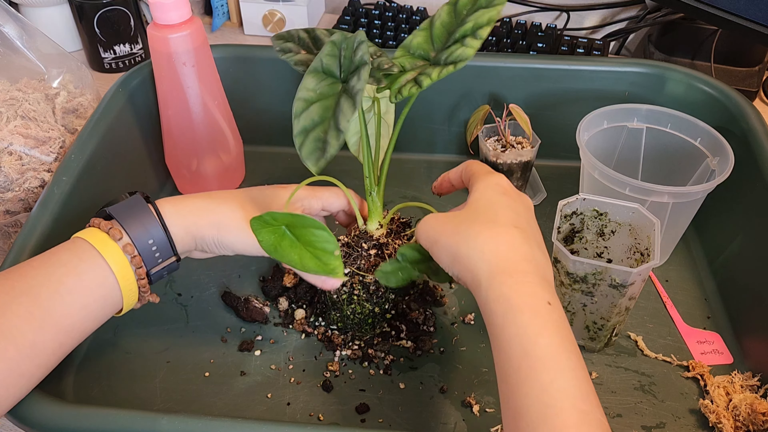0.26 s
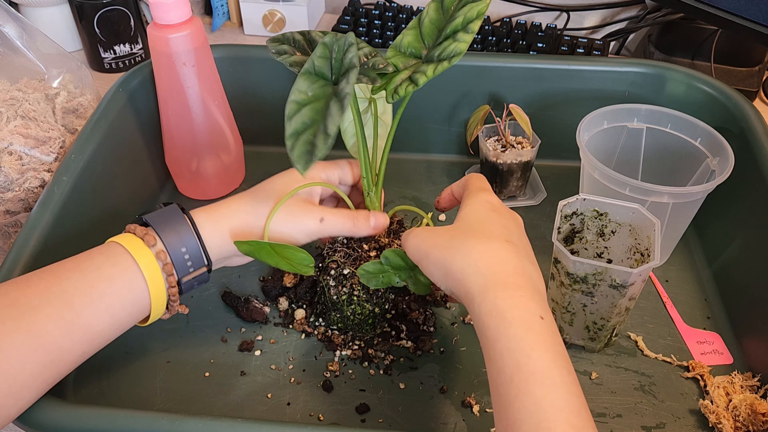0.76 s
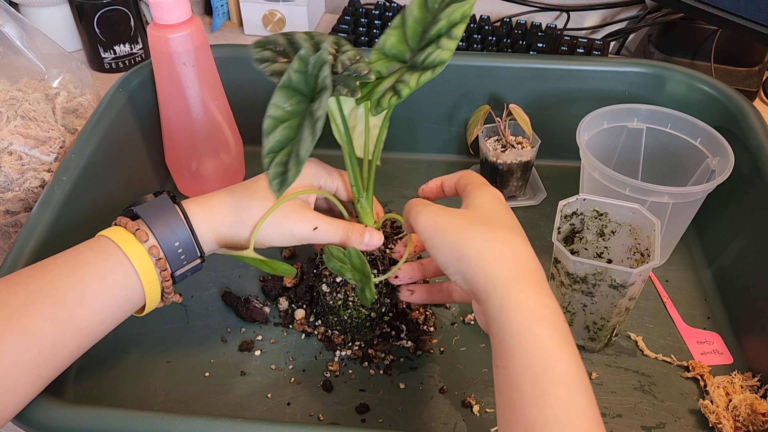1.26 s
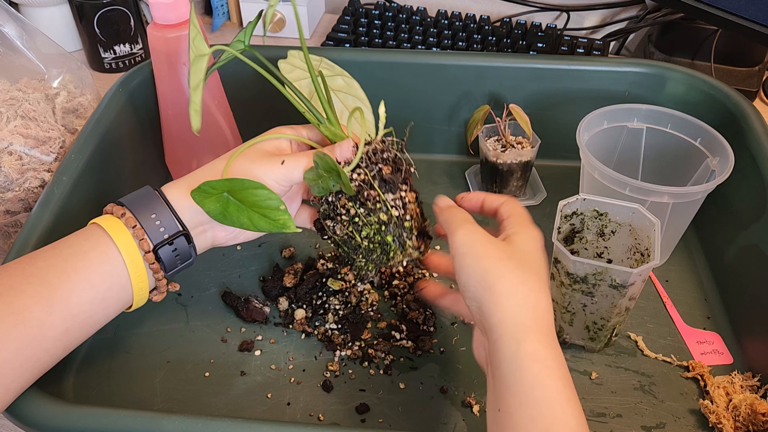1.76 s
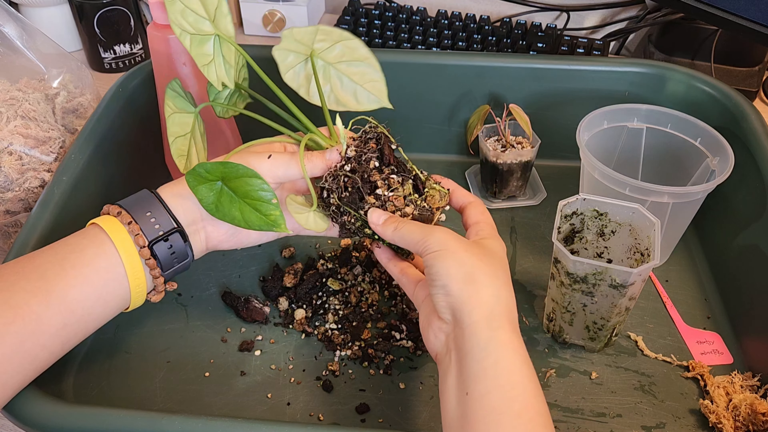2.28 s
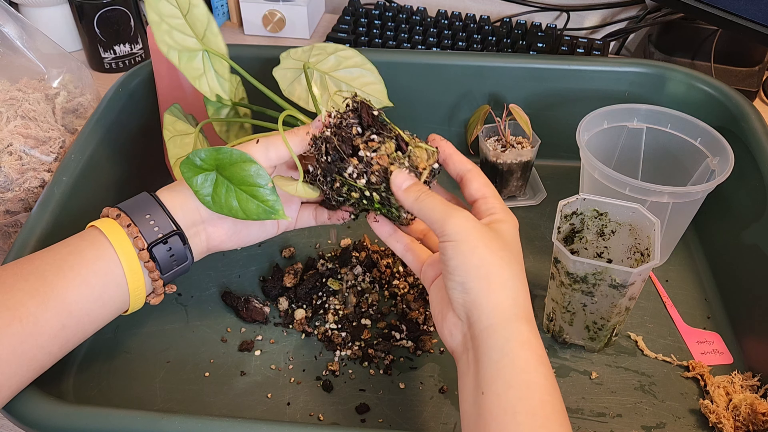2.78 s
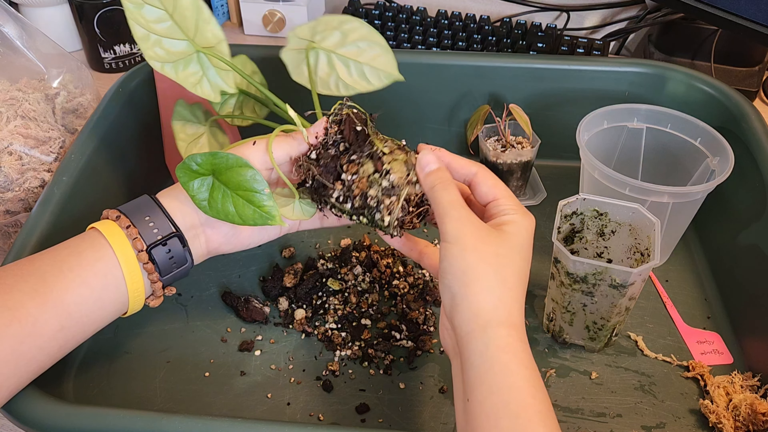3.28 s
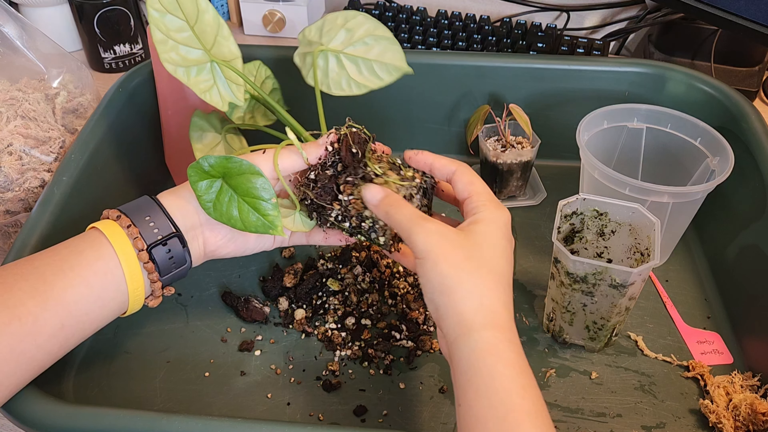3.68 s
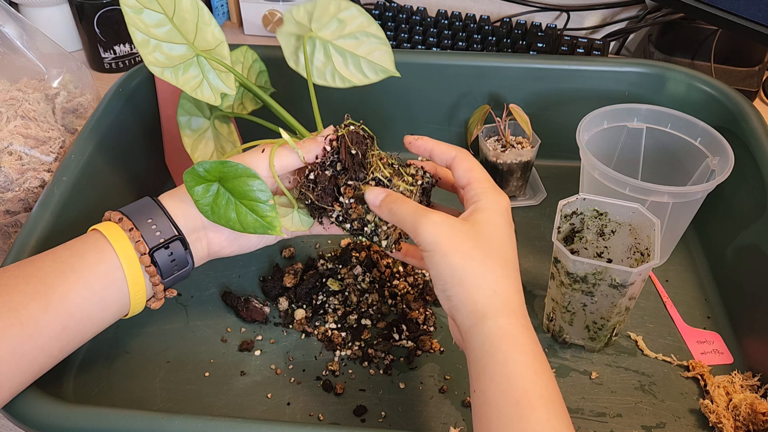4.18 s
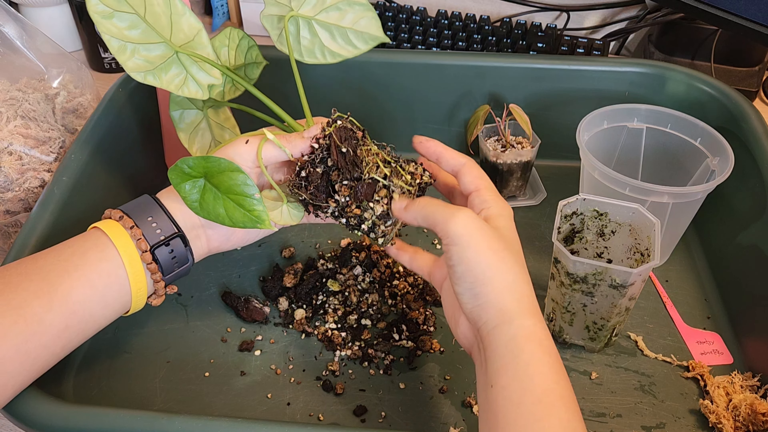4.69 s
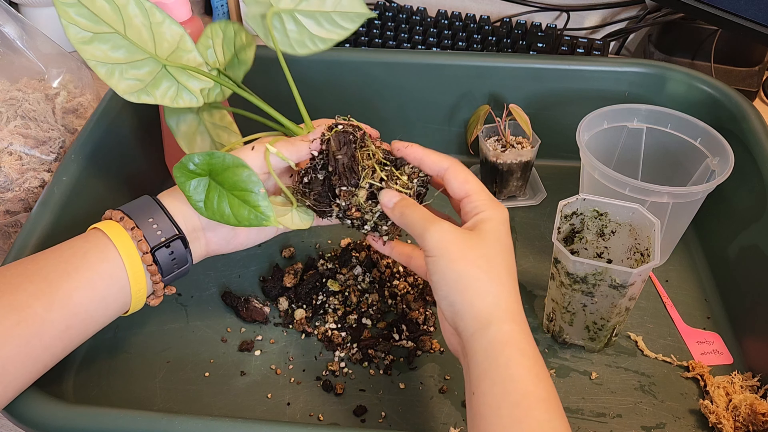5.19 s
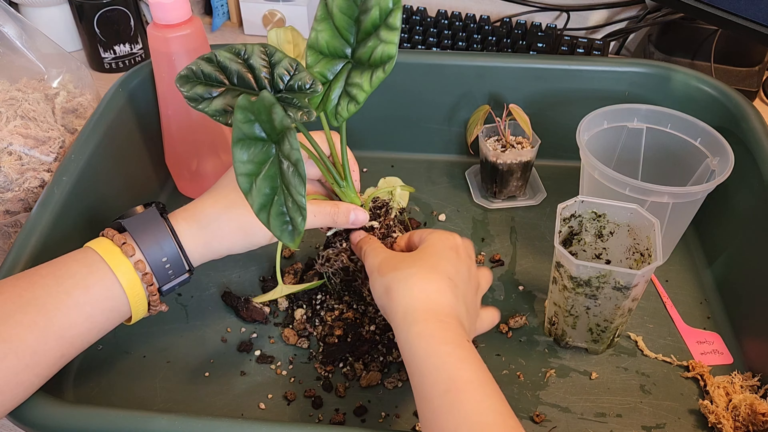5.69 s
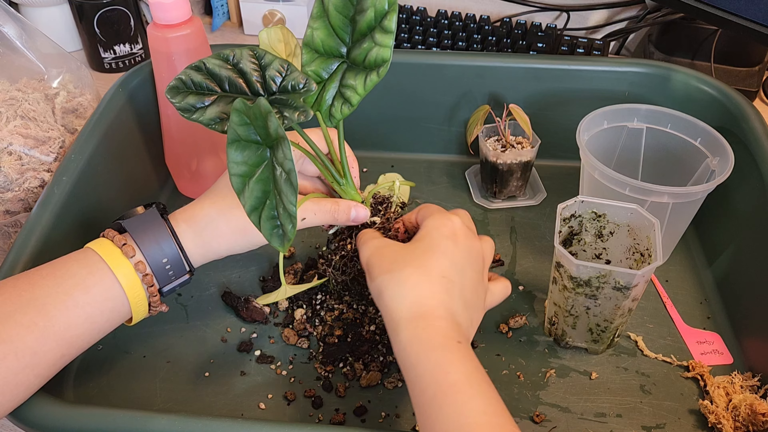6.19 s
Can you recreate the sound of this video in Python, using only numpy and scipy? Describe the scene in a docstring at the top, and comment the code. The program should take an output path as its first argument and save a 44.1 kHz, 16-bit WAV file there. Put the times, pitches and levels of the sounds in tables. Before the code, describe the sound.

Close, wide stereo sound of gritty soil falling into a plastic tub in a quiet room. An early flurry of clicks gives way to tiny sparse ticks, then busier pattering and a hard burst of knocks midway. Afterwards only faint crumbs, a few muted bumps and one clear click remain. The rustling abruptly fades after a tiny dip near the end, leaving soft rumble and hum.

```python
"""Grit and bark drop on a plastic tray as hands loosen a houseplant's root ball in a quiet room.
Each grain is a cracking noise burst, a short pitched ring and a diffuse tail; decaying sines thud below.
Flickering noise bands make a crumbling rustle and a treble hiss, over rumble and a faint hum.
Two spaced microphones hear it; all sound dips briefly once, near the end."""
import sys
import numpy as np
from scipy import signal
from scipy.io import wavfile

SR = 44100
rng = np.random.default_rng(int(sys.argv[2]) if len(sys.argv) > 2 else 0)


def digitize_waveform(pressure):
    """Quantize a signal to 16-bit integers and store it at the path in sys.argv[1].

    Rows of a 2-D input are taken as channels; values are limited to [-1, 1].
    """
    field = np.atleast_2d(pressure).T
    bounded = np.clip(field, -1, 1)
    quanta = np.round(bounded * 32767).astype(np.int16)
    wavfile.write(sys.argv[1], SR, quanta)


N = 284445

# Grit leaving for the tray. Each row: start in seconds, level in dB, ring pitch in Hz, then in dB:
# weight below 1 kHz, brightness near 6 kHz, sizzle above 10 kHz, ring, scattering crumbs.
GRIT_HITS = [(0.1496, -34.5, 670, -8.5, -26, -29, -9, -6.5), (0.3476, -35, 1630, -8, -9, -9, -7, -7),
             (0.3935, -50, 1630, -10, -14, -17, -8, -3), (0.4397, -58.5, 1350, -15, -2, -2, -1, -19),
             (0.5082, -49.5, 2400, -26, -3.5, -13, -4.5, -8.5), (0.5636, -46, 1950, -16, -3, -7.5, -4, -9),
             (0.5776, -44, 780, -10, -31, -25, -10, 4), (0.605, -28, 1310, -14.5, -39, -35, -5.5, -7),
             (0.625, -22, 1440, -9.5, -11, -17.5, -10, -6),
             (0.6677, -26, 1420, -19.5, -10.5, -24, -11, -8.5),
             (0.6955, -34, 2000, -10.5, -16, -34, -4, -7.5), (0.7238, -41, 970, 6.5, -5.5, -9, -16, -20.5),
             (0.7384, -53, 902, -2, -19, -10, -5, -23), (0.8718, -53.5, 990, -0.5, -28, -26, 1, -5),
             (0.8895, -55.5, 2100, -21, -22, -32, 1, 7), (0.941, -52, 1930, -6, -8, -31, -4, -1),
             (1.266, -49, 714, -26, -27, -28, -3, 6.5), (1.2835, -46, 870, -26, -19, -26, -3, -4),
             (1.298, -45, 2150, -19, -17, -34, -4, 4), (1.322, -52, 2200, -20, -18, -21, -8, -3),
             (1.3957, -57, 3220, -23, -12, -21, -2, 6.5), (1.4312, -53.5, 2200, -4, -11, -20, -8, -1),
             (1.4406, -54.5, 2170, -1, -10, -22, 5, 0.5), (1.5609, -40, 2080, -12.5, -20.5, -30, -5, 0.5),
             (1.579, -51, 1200, -12, -19, -24, -6, 9), (1.6127, -40, 3290, -13, -15, -29, -2, -12),
             (1.6204, -42.5, 2210, -10, -20, -28, -8, -4), (1.634, -50, 802, -16, -17, -16, -2, -8),
             (1.6582, -41.5, 2120, -11, -10.5, -9, -7, -14), (1.672, -42, 1810, -6, -18, -24, -3, -8),
             (1.72, -41.5, 999, -1.5, -5, -9, 0, -7.5), (1.7474, -39, 3120, -14, -23, -30, -8.5, 0.5),
             (1.7994, -50, 3200, -22, 2.5, -5, 0, -10), (2.0482, -55.5, 797, 4, -4, 1, -1, -3.5),
             (2.0698, -48.5, 4240, -20, 2, 2, -11, -4), (2.152, -28, 1600, -16, -11, -28, -20, -7),
             (2.2202, -29.5, 3300, -19, -7, -9, -4.5, -10), (2.3212, -50.5, 956, -1.5, -25, -16, -8, -7),
             (2.4453, -37, 1900, -12.5, -13.5, -16, -10, -7), (2.4997, -51, 956, -13, -9, -6, -1, -5),
             (2.5205, -47, 956, -23, -3.5, -9, -5, -4), (2.6743, -52.5, 844, -15, -17, -14, -6, -9),
             (2.7724, -30.5, 3100, -15, -10, -12.5, -10, -6), (2.848, -31, 1760, -10, -12, -13, -5, -3.5),
             (2.8614, -38.5, 3050, -16, -7, 3.5, -11, -9), (2.8819, -38.5, 1370, -8, -13, -14, -3, -9.5),
             (2.905, -43, 4170, -28, -7, -23, -3, -8), (2.9224, -40.5, 694, -2, -17, -23, -5.5, -13),
             (2.9497, -46, 1400, -13, -10, -14, -8, -4), (2.973, -48, 3070, -26, -10, -10, -3, -3),
             (3.0296, -40.5, 1000, -9, -6, -7, -8, -9), (3.041, -36.5, 720, -11, -6.5, -3.5, -12, -8),
             (3.0754, -46.5, 760, -13, -18, -9, -3, 0), (3.124, -51.5, 1400, -13, -7, -12, -2, 0),
             (3.1667, -43.5, 1243, -11, -20, -19, 2, -9), (3.4861, -32, 1460, -13.5, -10, -16.5, -8, -9),
             (3.5255, -27.5, 3240, -15, -10, -14.5, -12, -9),
             (3.5488, -30, 3350, -18.5, -10.5, -15, -5, -9.5), (3.5824, -8, 1550, -12, -3.5, -9, -10, -10),
             (3.6022, -9, 972, -11.5, -10.5, -14, -7.5, -10),
             (3.6218, -7.5, 1620, -18.5, -9, -14.5, -11, -8), (3.676, -16, 1690, -14, -12, -18, -9.5, -9),
             (3.6896, -27, 1400, -12, -19, -43, -6, -18), (3.7337, -19, 1570, -10.5, -6, -21, -10, -9.5),
             (3.8589, -43.5, 966, -8, -17, -22, -2.5, -3.5), (3.871, -42.5, 1410, -10, -11, -3.5, -5, -12),
             (3.8838, -46, 1620, -11, -14, -23, -1, -5), (3.9132, -45, 1570, -12, -23, -18, -12, 1),
             (3.9634, -34, 882, -15.5, -12.5, -17.5, -13.5, -6),
             (4.1184, -61.5, 703, -12, -1.5, -14, -8, -6.5), (4.5564, -64, 802, -13, 3, 11, -8.5, -7),
             (4.6493, -41.5, 1888, -7, -6.5, -12.5, -5, -2.5),
             (4.871, -49.5, 760, 1, -8, -12.5, -3.5, -3.5), (4.9489, -47.5, 860, -9, -10, -17, -8, -4.5),
             (4.9668, -47, 1420, -7, -23, -12, -2, -10), (5.0666, -28.5, 910, -2.5, -12, -10, -9, -6.5),
             (5.089, -41, 963, 3, -32, -22, 1, -33), (5.1314, -59, 778, -25, -1, -5, -8, -9),
             (5.3111, -48, 803, -10, -9, -17, -3, -6), (5.3453, -67, 734, -8, -17, -17, -8, -13),
             (5.418, -27, 685, -23, -19, -39, -4.5, -15), (5.4244, -16, 2023, -17, -13.5, -47, -5.5, -6.5),
             (5.4654, -48, 820, -27.5, -16, -1, -4, -16), (5.5169, -52, 837, 5.5, -25, -16, -3, -15)]
# Colour common to all ticks. Each row: pitch in Hz, gain in dB.
TICK_COLOUR = [(250, 4), (400, -2.5), (600, 8.5), (950, 7.5), (1600, 2.5), (3000, -3), (6000, 8),
               (10000, 7), (16000, 3.5)]
# Dying of the crack. Each row: pitch in Hz, time to fall 60 dB in seconds.
CRACK_DECAY = [(500, 0.041), (2000, 0.019), (8000, .012)]
# Dying of the near walls' answer. Each row: pitch in Hz, time to fall 60 dB in seconds.
TAIL_DECAY = [(350, 0.38), (800, 0.18), (2000, 0.18), (5500, 0.17), (9000, 0.15), (15000, 0.13)]
# Bumps of the tray's floor. Each row: time in seconds, level in dB, base time to fall 60 dB in seconds.
FLOOR_BUMPS = [(0.16, -36, 0.26), (0.547, -43, 0.22), (0.731, -39, 0.22), (1.297, -53.5, 0.53),
               (2.35, -51, 0.3), (2.97, -39, 0.092), (3.184, -49.5, 0.23), (3.596, -41.5, 0.57),
               (3.678, -39, 0.33), (3.875, -50, 0.47), (4.651, -46.5, 0.16), (4.885, -32.5, 0.16),
               (5.078, -34.5, 0.11), (5.767, -48, 0.18), (6.055, -43.5, 0.15)]
# Modes of the tray's floor. Each row: pitch in Hz, gain in dB, share of the base decay time.
FLOOR_MODES = [(150.9, 3, 0.94), (161.6, -8, 0.77), (112, -5, .6)]
# Resonances of the plastic. Each row: pitch in Hz, width in Hz, gain in dB relative to the others.
TRAY_MODES = [(884, 23, 0.5), (1127, 40, 13), (1700, 81, -22), (2280, 22, 10), (2250, 130, -16),
              (3650, 33, -16), (4264, 81, -18.5), (6160, 300, -8.5), (5800, 290, -24.5)]
# Fingers crumbling the mix, and treble hiss, in two parts; the rustle drops abruptly between them.
# Each row: time in seconds, then levels in dB before flicker: crumbling, lower hiss, upper hiss.
RUSTLE_PARTS = [
    [(0.0, -68, -71.5, -77), (0.58, -77.5, -67, -78), (0.74, -71, -77, -77.5), (1.29, -74.5, -77.5, -80),
     (1.55, -71, -73, -76.5), (2.03, -80, -77.5, -75), (2.23, -69.5, -69, -69.5), (2.8, -72.5, -67, -69.5),
     (2.98, -67, -67, -72), (3.27, -70, -66, -64), (3.52, -76, -66, -71), (3.71, -60, -65, -72),
     (4.08, -73, -75, -75), (4.43, -79.5, -74, -74.5), (4.9, -78, -76, -79), (5.09, -69.5, -68, -72.5),
     (5.45, -80, -73, -73.5), (5.64, -66.5, -71, -72)],
    [(5.65, -78, -76, -74), (6.044, -79, -88, -80.5), (6.45, -86.5, -81, -79)],
]
# Colour of the crumbling before the tray answers. Each row: pitch in Hz, relative density in dB per Hz.
CRUMBLE_COLOUR = [(600, -1), (1200, 3.5), (2200, -4), (3500, -16.5), (6000, -10)]
# Colour of the lower treble hiss. Each row: pitch in Hz, relative density in dB per Hz.
LOWER_HISS_COLOUR = [(3500, -8.5), (5300, -13.5), (6400, -6.5), (7600, 9), (9000, -17.5), (10500, -12)]
# Colour of the upper treble hiss. Each row: pitch in Hz, relative density in dB per Hz.
UPPER_HISS_COLOUR = [(9500, -2.5), (10500, -21.5), (12500, 1), (14000, -2.5), (15500, -7)]
# Colour of the room's rumble. Each row: pitch in Hz, relative density in dB per Hz.
ROOM_COLOUR = [(25, -25), (36, -10.5), (50, -1), (100, -5), (150, -1.5), (320, -6.5), (450, -15.5),
               (900, -24.5), (1250, -41), (1600, -34), (2050, -33.5), (2600, -39.5), (4000, -71)]
# How alike the microphones hear a pitch. Each row: pitch in Hz, left-right likeness (1 is identical).
LIKENESS_BY_PITCH = [(60, 0.99), (180, 0.94), (350, 0.77), (700, 0.18), (1500, 0.13), (3000, 0.09),
                     (16000, 0.01)]
# Stereo lean of the steady sounds. Each row: pitch in Hz, left over right in dB.
STEADY_LEAN = [(60, 1), (200, 1), (600, 7.5), (2000, 4), (8000, 8), (15000, 5.5)]

TRAY_DB = -9.5  # common to all the tray's modes
ROOM_DB = -53
HUM_HZ, HUM_WIDTH_HZ, HUM_DB = 127.93, 3.7, -60  # width of each of two resonators in a row
RING_CYCLES = 74  # cycles in which a ring at 0 dB falls by 60 dB
RING_LINGERS = .6  # stronger rings last longer: this share of their dB lengthens them
SPREAD_S, DELAY_S = .001, .001  # span of a grain's touches; delay of every grain after its listed time
RISE_T60_S, BUILD_T60_S = .0015, .025  # onset of the crack; onset of the tail
RATTLE_DB = 1.8  # unevenness of the tail
BODY_DB = -3.5  # lowest band against the weight
COLOUR_SCATTER_DB = 2.5  # each grain's bands differ by chance
TAIL_DULL_DB = -3  # treble change in the tail
GRIT_LEAN_DB, GRIT_SCATTER_DB = 2, 1.6  # left over right: mean and spread across the grains
DIP_S, DIP_LENGTH_S, DIP_DB = 5.644, .014, -22  # deepest moment, time to return, depth
CUTOFF_HZ = 16800


def amp(db):
    """Turn dB into linear gain."""
    return 10 ** (np.asarray(db) / 20)


def rms_one(x):
    """Bring a sound to an rms of 1."""
    return x / np.sqrt(np.mean(x ** 2) + 1e-20)


def at_hz(points, hz):
    """Read a table over pitch on a log axis."""
    pitches, values = np.array(points).T
    return np.interp(np.log(hz), np.log(pitches), values)


def drift(rate):
    """Slow chance below about rate Hz, spread 1: noise through two equal smoothing poles."""
    step = 40  # samples between the slow values
    r = np.exp(-2 * np.pi * step * rate / SR)
    noise = rng.standard_normal(N // step + 2002)
    slow = signal.lfilter([1], [1, -2 * r, r * r], noise)[2000:]  # drop the settling
    return np.interp(np.arange(N) / step, np.arange(len(slow)), rms_one(slow))


def band(x, low, high):
    """Keep the sound between two pitches in Hz."""
    sos = signal.butter(2, [low, high], "band", fs=SR, output="sos")
    return signal.sosfilt(sos, x + 1e-18)


def resonance(x, hz, width):
    """A two-pole resonator whose gain is 1 on top; a narrower width in Hz rings longer."""
    r = np.exp(-np.pi * width / SR)
    feed = np.array([1, 0, -1]) * (1 - r * r) / 2
    return signal.lfilter(feed, [1, -2 * r * np.cos(2 * np.pi * hz / SR), r * r], x)


def dying(clicks, t60):
    """An envelope that jumps at each click and falls 60 dB in t60 seconds."""
    return signal.lfilter([1], [1, -amp(-60 / (t60 * SR))], clicks + 1e-18)


def pair(hz, mid, side):
    """Left and right from two noises, as alike as spaced microphones hear that pitch."""
    alike = np.clip(at_hz(LIKENESS_BY_PITCH, hz), -1, 1)
    return np.sqrt((1 + alike) / 2) * mid + np.sqrt((1 - alike) / 2) * side * [[1], [-1]]


def banded(spectrum, white, patchy_db):
    """Third-octave bands of stereo noise, each with its own flicker and lean; rms 1."""
    edges = 24.6 * 2 ** (np.arange(29) / 3)
    lowest, highest = spectrum[0][0] / 1.15, spectrum[-1][0] * 1.15
    out = 0
    for k, (low, high) in enumerate(zip(edges, edges[1:])):
        hz = np.sqrt(low * high)
        if lowest < hz < highest:
            lean_db = at_hz(STEADY_LEAN, hz) * np.array([[.5], [-.5]])
            gain = amp(at_hz(spectrum, hz) + patchy_db * drift(13) + lean_db)
            # neighbouring bands take different noise
            out = out + gain * pair(hz, *band(white[k % 2], low, high))
    return rms_one(out)


def room():
    """Broad noise rumbles; noise through two narrow resonators becomes a wavering hum."""
    rumble = banded(ROOM_COLOUR, rng.standard_normal((2, 2, N)), patchy_db=.8)
    hum = resonance(rng.standard_normal(N), HUM_HZ, HUM_WIDTH_HZ)
    hum = resonance(hum, HUM_HZ, HUM_WIDTH_HZ)
    return amp(ROOM_DB) * rumble + amp(HUM_DB) * rms_one(hum)


def tray(x):
    """The sound with the plastic tray's modes ringing along, in alternating polarity."""
    out = x
    for k, (hz, width, db) in enumerate(TRAY_MODES):
        out = out + (-1) ** k * amp(TRAY_DB + db) * resonance(x, hz, width)
    return out


def rustle():
    """The mix crumbles in dense chance grains that wake the tray; two bands of flickering treble hiss lie above."""
    s, *levels = np.transpose(np.concatenate(RUSTLE_PARTS))
    crumble_db, lower_db, upper_db = [np.interp(np.arange(N) / SR, s, db) for db in levels]
    heights = amp(4.0 * np.minimum(rng.exponential(1, N), 4))
    grains = heights * (rng.random(N) < 300 / SR)  # about 300 a second
    white = rng.standard_normal((2, 2, N))
    grainy = white * (1 + .8 * dying(grains, .012))
    crumble = rms_one(tray(banded(CRUMBLE_COLOUR, grainy, patchy_db=2.1)))
    hiss = amp(lower_db) * banded(LOWER_HISS_COLOUR, white, patchy_db=1.8)
    hiss = hiss + amp(upper_db) * banded(UPPER_HISS_COLOUR, white, patchy_db=1.8)
    crumble_gain = amp(crumble_db + 2.5 * drift(25))
    hiss_flicker = amp(1.1 * drift(20) + 1.5 * drift(5))
    return crumble_gain * crumble + hiss_flicker * hiss


def thuds():
    """A soft push sets the tray's broad floor swinging: sines that swell in and die away."""
    out = np.zeros(N)
    for s, level_db, t60 in FLOOR_BUMPS:
        t = np.maximum(np.arange(N) / SR - s + .006, 0)  # the swing starts 6 ms ahead of the listed time
        swell = 1 - np.exp(-t / 0.0086)
        for hz, db, share in FLOOR_MODES:
            decay = amp(level_db + db + 4 - 60 * t / (t60 * share))
            out += decay * swell * np.sin(2 * np.pi * hz * t)
    return out


def touches(s):
    """An uneven grain lands in three quick touches, the first one hardest: their samples and strengths."""
    late, strength = rng.random((2, len(s), 3))
    late[:, 0], strength[:, 0] = 0, 1
    at = np.round((s[:, None] + DELAY_S + SPREAD_S * late) * SR).astype(int)
    return at, strength * [1, .7, .7]


def cracks_and_tails(at, strength, sides, colour):
    """Half-octave noise bands jump at each touch and die at their own pace, waking the tray."""
    _, level_db, _, low_db, bright_db, top_db, _, tail_db = np.transpose(GRIT_HITS)
    edges = 212 * 2 ** np.arange(0, 6.6, .5)
    white = rng.standard_normal((2, 2, N))
    rattle = amp(RATTLE_DB * drift(150))  # crumbs settling make the tail uneven
    out = 0
    for k, (low, high) in enumerate(zip(edges, edges[1:])):
        hz = np.sqrt(low * high)
        # how far this band belongs to body, weight, middle, brightness and sizzle
        centres = np.log([400, 900, 2500, 6200, 12000])
        body, weight, _, bright, sizzle = [np.interp(np.log(hz), centres, row) for row in np.eye(5)]
        tone_db = body * (low_db + BODY_DB) + weight * low_db + bright * bright_db + sizzle * top_db
        chance_db = COLOUR_SCATTER_DB * colour[:, k]
        gain = sides * amp(level_db + tone_db + chance_db + at_hz(TICK_COLOUR, hz))
        tail_gain = gain * amp(tail_db + (bright + sizzle) * TAIL_DULL_DB)
        crack, tail = np.zeros((2, 2, N))
        np.add.at(crack, (slice(None), at), gain[:, :, None] * strength)
        np.add.at(tail, (slice(None), at[:, 0]), tail_gain)
        # a slow decay less a fast one gives a rounded onset
        crack = dying(crack, at_hz(CRACK_DECAY, hz)) - dying(crack, RISE_T60_S)
        tail = dying(tail, at_hz(TAIL_DECAY, hz)) - dying(tail, BUILD_T60_S)
        envelope = crack + rattle * tail
        out = out + band(envelope * pair(hz, *white[k % 2]), low, high)
    return tray(out)


def rings(at, sides):
    """A dying noise burst excites a resonator at each grain's own pitch."""
    _, level_db, ring_hz, _, _, _, ring_db, _ = np.transpose(GRIT_HITS)
    t = np.arange(3000) / SR
    out = np.zeros((2, N))
    for k, hz in enumerate(ring_hz):
        noise = pair(hz, *rng.standard_normal((2, len(t))))
        burst = noise * amp(-60 * t / at_hz(CRACK_DECAY, hz))
        cycles = RING_CYCLES * amp(RING_LINGERS * ring_db[k])
        width = np.log(1000) / np.pi * hz / cycles  # falls 60 dB in that many cycles
        rung = resonance(burst, hz, width)
        gain = sides[:, [k]] * amp(level_db[k] + ring_db[k])
        start = at[k, 0]
        out[:, start:start + len(t)] += gain * rung / np.abs(rung).max()
    return out


def grit():
    """Each grain is a crack of its own colour, a short ring at its own pitch and a diffuse tail."""
    s = np.transpose(GRIT_HITS)[0]
    at, strength = touches(s)
    colour = rng.standard_normal((len(s), 14))  # 13 bands, then the stereo place
    lean_db = GRIT_LEAN_DB + GRIT_SCATTER_DB * colour[:, -1]
    sides = amp(np.outer([.5, -.5], lean_db))
    return cracks_and_tails(at, strength, sides, colour) + rings(at, sides)


def scene():
    """Everything on and around the tray, from the background to the grit."""
    return room() + rustle() + thuds() + grit()


def record(dry):
    """Peaks are rounded, the level dips once, the microphones miss the deepest bass, the top is cut."""
    rounded = 1.1 * np.tanh(dry / 1.1)
    since_dip = np.arange(N) / SR - DIP_S
    dip_db = np.interp(since_dip, [-DIP_LENGTH_S / 10, 0, DIP_LENGTH_S], [0, DIP_DB, 0])
    dipped = rounded * amp(dip_db)
    bass_cut = signal.butter(2, 32, "high", fs=SR, output="sos")
    top_cut = signal.cheby2(14, 70, CUTOFF_HZ, fs=SR, output="sos")
    return signal.sosfilt(top_cut, signal.sosfilt(bass_cut, dipped))


dry = scene()
out = record(dry)
digitize_waveform(out)
```